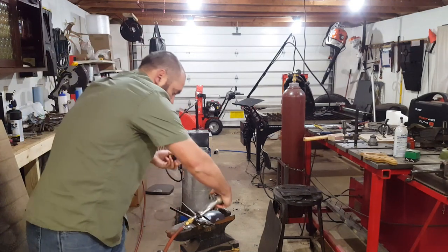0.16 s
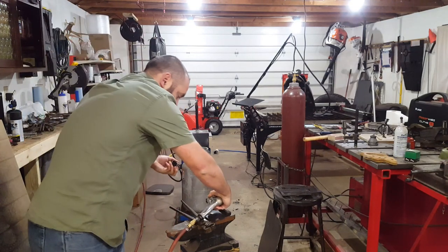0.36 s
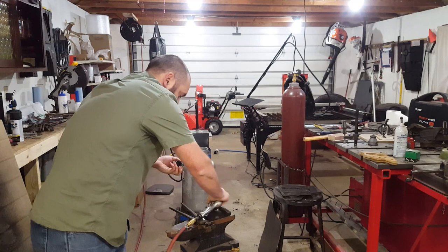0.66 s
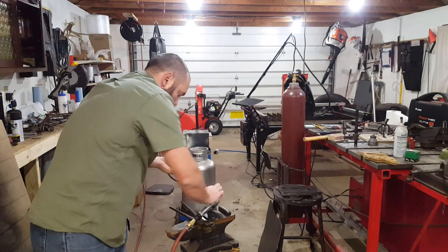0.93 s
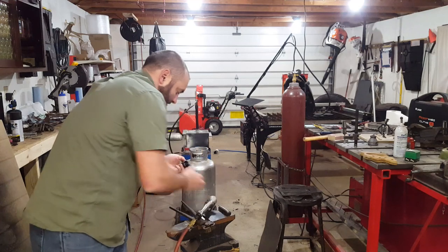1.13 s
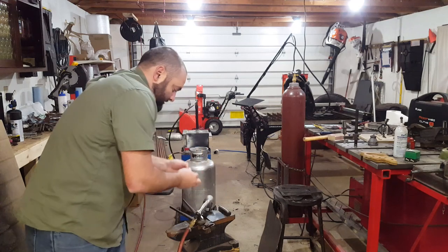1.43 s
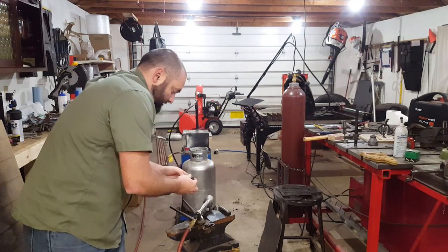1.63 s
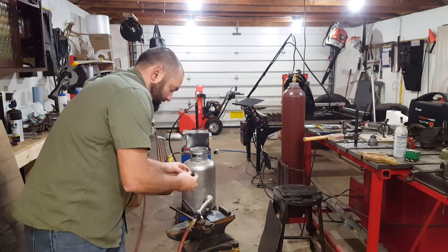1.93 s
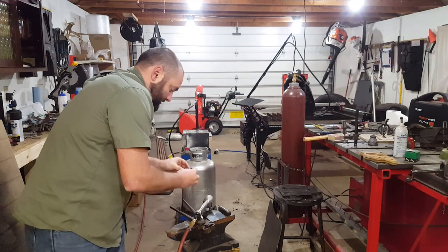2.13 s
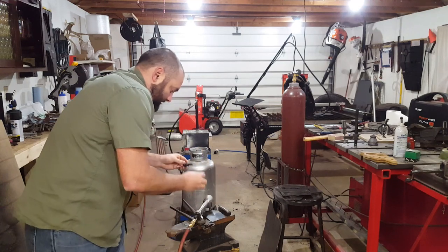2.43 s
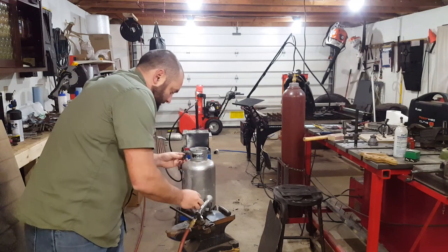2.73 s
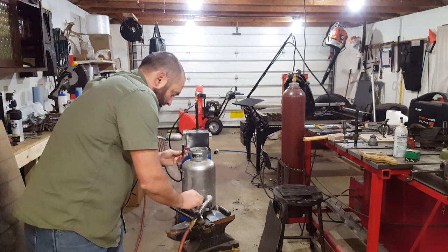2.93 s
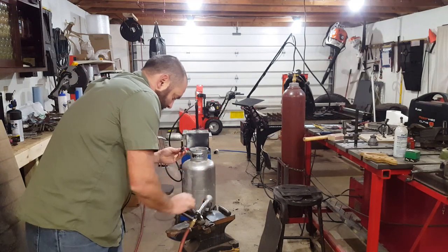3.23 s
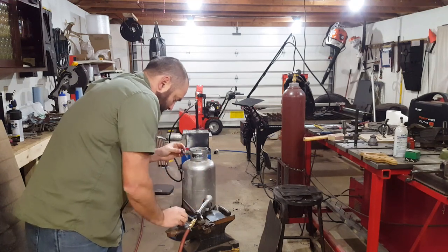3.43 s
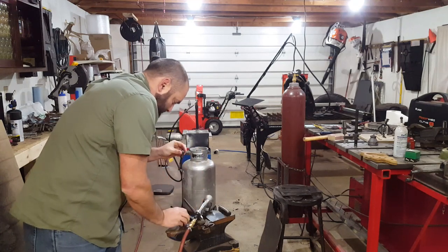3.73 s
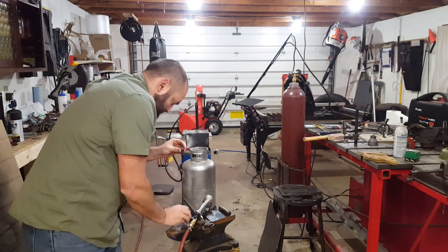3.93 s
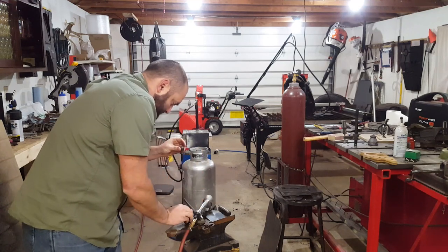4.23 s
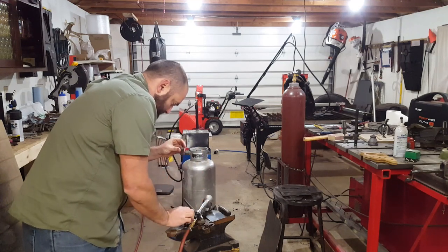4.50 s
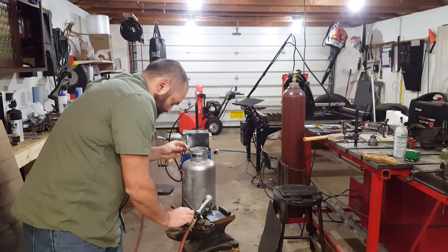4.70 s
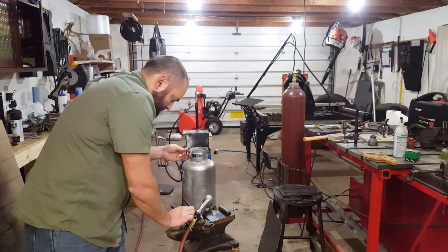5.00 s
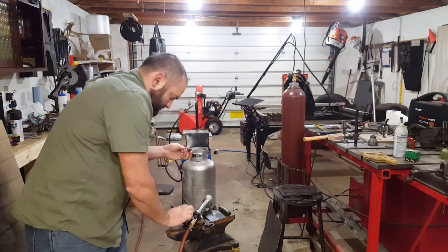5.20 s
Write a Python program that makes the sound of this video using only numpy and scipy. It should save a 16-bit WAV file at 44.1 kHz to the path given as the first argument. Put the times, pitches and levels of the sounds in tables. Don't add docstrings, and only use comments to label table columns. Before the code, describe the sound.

Soft handle knocks, a sudden loud metallic crash and rattling chisel chatter, then long near-quiet with small fittings ticking and tapping in a garage.

```python
import sys
import numpy as np
from scipy import signal
from scipy.fft import rfft, irfft
from scipy.io import wavfile
from scipy.ndimage import uniform_filter1d

SR = 44100
rng = np.random.default_rng(int(sys.argv[2]) if len(sys.argv) > 2 else 0)


def master_out(mix):
    frames = np.transpose(np.atleast_2d(mix))
    ceiling = np.clip(frames, -1, 1)
    pcm = np.round(ceiling * 32767).astype(np.int16)
    wavfile.write(sys.argv[1], SR, pcm)


def volts_from_decibels(level):
    exponent = np.asarray(level, float) / 20
    return 10 ** exponent


N = 236183
SPAN = 3 * 2 ** 13
HZ = np.fft.rfftfreq(SPAN, 1 / SR)

# (time [s], peak level [dB], landing [dB])
BANGS = [(.7288, -9.5, 2), (.7313, -9, 4), (.7358, -9.5, 11), (.7432, -13, 3.5), (.7485, -14, -9),
         (.7595, -15, -2), (.7615, -15, -8.5), (.768, -19, 6), (.7838, -19.5, -8), (.789, -22.5, 9.5),
         (.794, -17.5, -8.5)]
# (frequency [Hz], width [Hz], level [dB])
BARREL = [(306, 76, -23), (1680, 140, -12), (2055, 30, -2), (2130, 26, -3), (2260, 29, -6), (2485, 50, -3),
          (2832, 25, -3), (2915, 45, -1), (3012, 25, -6), (3225, 30, -9), (4385, 34, -6), (4820, 24, -7),
          (5182, 25, -8), (5300, 30, -6), (5628, 22, 0), (6140, 30, -11), (7050, 60, -4), (7315, 45, -2),
          (7405, 40, -5), (7725, 35, -7), (8120, 90, -10), (8400, 200, -9), (8870, 100, -16),
          (9488, 23, -12), (11200, 90, -19), (11800, 90, -19), (12500, 80, -13), (13100, 90, -13),
          (14600, 90, -15)]
# (frequency [Hz], density [dB per Hz])
BARREL_CRACK = [(71, -58.5), (120, -26), (289, -19.5), (727, -19.5), (1120, -25.5), (2070, -7.5),
                (2930, -3), (3740, -13.5), (5520, -5), (6630, -17.5), (7200, -1.5), (10200, -20),
                (16000, -13.5)]
# (frequency [Hz], tilt [dB per landing dB])
ROCK = [(600, 0), (1900, -.5), (2600, 0), (3500, .05), (5500, .15), (7500, .55), (10000, .15), (14000, .15)]


def bangs():
    return strikes(BANGS, BARREL, BARREL_CRACK, ROCK, crack_db=-4.5, blow_s=0.018,
                   wet_db=-0.5, trim_db=-11.5, pan_db=6.0)


# (time [s], peak level [dB], landing [dB])
CHATTER = [(.8605, -18.5, -17), (.8665, -24.5, -11.5), (.8715, -20, 13), (.880, -27.5, -4),
           (1.1085, -25, 12), (1.1165, -19.5, 12.5), (1.120, -24.5, -8), (1.133, -25.5, -14),
           (1.1445, -19.5, -4.5), (1.151, -25.5, 6), (1.154, -26, 9.5), (1.159, -27.5, -4.5),
           (1.168, -27, 4), (1.182, -28, -9.5), (1.194, -28, 18), (1.2005, -25.5, 8), (1.229, -22.5, -14),
           (1.235, -20, 7), (1.2395, -14.5, 13), (1.2525, -26, -1), (1.264, -30.5, 2),
           (1.291, -20.5, -14.5), (1.3035, -18.5, 7), (1.308, -21, -15.5), (1.318, -27.5, -1),
           (1.3205, -27.5, -3), (1.334, -27.5, -10), (1.3385, -31, -4)]
# (frequency [Hz], width [Hz], level [dB])
SHANK = [(1688, 26, -7), (1748, 24, -6), (1808, 20, -6), (1884, 20, -5), (1962, 30, -2), (2068, 28, -7),
         (2135, 24, -7), (1860, 300, -7)]
# (frequency [Hz], width [Hz], level [dB])
CHISEL = [(2490, 150, -14), (2880, 120, -10), (3340, 110, -11), (4310, 25, -10), (4578, 40, -8),
          (4858, 30, -6), (5300, 24, -13), (5626, 30, -6), (6190, 60, -12), (7100, 120, -11),
          (7400, 40, -5), (7468, 45, 3), (7548, 40, -4), (7760, 52, -7), (7550, 400, -9), (8930, 30, -11),
          (9490, 42, -17), (10200, 72, -18), (11400, 120, -20), (12500, 41, -22), (13300, 110, -17),
          (14400, 120, -22), (15000, 52, -16), (15300, 40, -19)]
# (frequency [Hz], density [dB per Hz])
CHISEL_CRACK = [(71, -63), (120, -16.5), (592, -14), (1320, -17.5), (1680, -9), (1900, 2), (2240, -8.5),
                (4680, -4.5), (6500, -11), (7500, -5.5), (9400, -24.5), (15000, -26.5), (16000, -35.5)]


def chatter():
    return strikes(CHATTER, [*SHANK, *CHISEL], CHISEL_CRACK, ROCK, crack_db=-5, blow_s=0.015,
                   wet_db=-1.5, trim_db=-13.0, pan_db=5.5)


# (time [s], hold [s], level [dB])
RATTLE = [
    (1.101, 0.006, -42),
    (1.156, 0.04, -48),
    (1.245, .03, -50),
    (1.31, 0.03, -50),
]


def rattle():
    loose = swell(RATTLE, rise_db_per_s=899, fall_db_per_s=900)
    return rubbing(loose, [*SHANK, *CHISEL], rate=500, spread_db=-8.0, pan_db=19.5, wet_db=5.5)


# (time [s], peak level [dB], landing [dB])
SLIP = [
    (.7008, -15.5, 2.5),
    (.7065, -17.5, -8.5),
]
# (frequency [Hz], width [Hz], level [dB])
VALVE = [(2490, 25, -3), (2850, 25, 0), (4310, 41, -5), (5310, 30, -10), (7310, 30, -7), (7700, 30, -11),
         (8400, 400, -7), (8870, 34, -17), (10000, 26, -25), (13100, 40, -20), (14200, 61, -28)]
# (frequency [Hz], density [dB per Hz])
VALVE_CRACK = [(120, -36), (300, -13), (1000, -20.5), (2700, -6), (3700, -14.5), (5000, -13), (6300, -17),
               (8300, -6.5), (10000, -20), (16000, -27)]
# (frequency [Hz], tilt [dB per landing dB])
TIP = [(600, -0.5), (2000, 0), (4300, -1.5), (7700, 0.6), (12500, 1.18)]


def slip():
    return strikes(SLIP, VALVE, VALVE_CRACK, TIP, crack_db=-10.0, blow_s=0.018,
                   wet_db=6.5, trim_db=-16.0, pan_db=7.0)


# (time [s], peak level [dB], landing [dB])
DROPS = [
    (1.015, -27, 0),
    (1.0345, -32, -14),
    (1.065, -34, -16),
]
# (frequency [Hz], width [Hz], level [dB])
COLLAR = [(940, 90, -6), (1900, 300, -6), (2320, 40, -5), (2920, 39, -4), (3500, 300, -9), (4770, 43, -9),
          (5570, 150, -10), (7430, 37, -4), (7750, 40, 2), (8300, 200, -10), (8940, 28, -7),
          (10200, 82, -21), (11700, 120, -5), (13000, 150, -8), (14700, 41, -20), (15500, 65, -13)]
# (frequency [Hz], density [dB per Hz])
COLLAR_CRACK = [(120, -17), (200, -13.5), (722, -19.5), (933, -2.5), (1530, -13.5), (1940, -2),
                (6760, -12.5), (7680, -2.5), (9580, -28), (11500, -4.5), (16000, -16.5)]
# (frequency [Hz], tilt [dB per landing dB])
DULL = [(900, .6), (1800, 0), (8000, 0), (11000, 1)]


def drops():
    return strikes(DROPS, COLLAR, COLLAR_CRACK, DULL, crack_db=-0.5, blow_s=0.0085,
                   wet_db=3, trim_db=-9.5, pan_db=6.0)


# (time [s], peak level [dB], landing [dB])
KNOCKS = [
    (0.0408, -61.5, 4),
    (0.3107, -34.5, -2),
    (0.3144, -36, -2.5),
    (0.4863, -41, 10.5),
]
# (frequency [Hz], width [Hz], level [dB])
HANDLE = [(334, 36, -6), (587, 30, -2), (1220, 45, -12), (1440, 60, -3), (1670, 20, -8), (1980, 25, -4),
          (2170, 38, 0), (2370, 32, -4), (2650, 30, -6), (3130, 50, -1), (3880, 63, -7), (4340, 38, -11),
          (4710, 45, 0), (6070, 50, -11), (7970, 91, -20)]
# (frequency [Hz], density [dB per Hz])
HANDLE_CRACK = [(120, -27.5), (200, -5.5), (404, -4), (585, -5), (832, -12.5), (1310, -9.5), (1450, -3),
                (1830, -3.5), (3080, -4), (3460, -9.5), (4840, -10.5), (11000, -41.5), (14300, -71.5),
                (22000, -120)]
# (frequency [Hz], tilt [dB per landing dB])
FLAT = [(600, 1.7), (2000, 0.5)]


def knocks():
    return strikes(KNOCKS, HANDLE, HANDLE_CRACK, FLAT, crack_db=-1.0, blow_s=0.015,
                   wet_db=0.5, trim_db=-8.5, pan_db=7.5)


# (time [s], peak level [dB], landing [dB])
BUMPS = [
    (.503, -40, 22),
    (.561, -49.5, -20),
    (.571, -43, -5),
    (.59, -53, -6),
    (.61, -52, -8),
    (4.55, -59, 4),
    (4.575, -57, 8),
    (5.03, -57.5, 18),
]
# (frequency [Hz], width [Hz], level [dB])
HOSE = [(416.3, 350, 1), (1091.3, 280, -3.5), (1620, 110, -8), (2140, 110, -7.5)]
# (frequency [Hz], density [dB per Hz])
HOSE_CRACK = [(88, -35), (150, -6), (442, -1.5), (758, -10), (1150, 3.5), (1340, -12.5), (2100, -14.5),
              (6000, -39.5), (7800, -66.5), (13200, -120)]


def bumps():
    return strikes(BUMPS, HOSE, HOSE_CRACK, FLAT, crack_db=4, blow_s=0.0032,
                   wet_db=1.5, trim_db=-9.5, pan_db=7.0)


# (time [s], hold [s], level [dB])
SLIDE = [
    (.515, .06, -79),
]
# (frequency [Hz], width [Hz], level [dB])
SQUEAK = [(7800, 350, 0)]
# (time [s], hold [s], level [dB])
ZING = [
    (.571, .05, -83),
]
# (frequency [Hz], width [Hz], level [dB])
WHISTLE = [(5466, 150, -8), (7400, 120, 0)]
# (time [s], hold [s], level [dB])
RUSTLE = [
    (0, .07, -74),
    (4.535, 0.039, -73.5),
]
# (frequency [Hz], width [Hz], level [dB])
CLOTH = [(679, 290, 7), (2087, 1300, 0), (3100, 670, -13)]


def hands():
    slide = swell(SLIDE, rise_db_per_s=330.5, fall_db_per_s=331)
    squeak = rubbing(slide, SQUEAK, rate=2100, spread_db=2.0, pan_db=6.5, wet_db=2.5)
    tighten = swell(ZING, rise_db_per_s=2002, fall_db_per_s=399.5)
    zing = rubbing(tighten, WHISTLE, rate=2000, spread_db=1.5, pan_db=6.0, wet_db=-0.5)
    movement = swell(RUSTLE, rise_db_per_s=300, fall_db_per_s=89.5)
    rustle = rubbing(movement, CLOTH, rate=6900, spread_db=6, pan_db=3.5, wet_db=-3.5)
    return squeak + zing + rustle


# (time [s], peak level [dB], landing [dB])
CLINKS = [
    (4.1744, -41.5, -6.5),
    (4.1855, -51, 2),
    (4.2042, -52, 11),
    (4.229, -56, 9),
]
# (frequency [Hz], width [Hz], level [dB])
NUT = [(339, 30, -7), (587, 30, -7), (1705, 80, -1), (2630, 58, -15), (3370, 70, -11), (3690, 50, -12),
       (4400, 300, -10), (6100, 84, -20), (6970, 45, -11), (7850, 60, -14), (8260, 60, -9)]
# (frequency [Hz], density [dB per Hz])
NUT_CRACK = [(120, -3.5), (300, -7.5), (600, -13.5), (1000, -22.5), (1710, -7.5), (2300, -13.5),
             (4300, -13.5), (7900, -12.5), (9900, -27), (12400, -17), (16000, -24)]


def clinks():
    return strikes(CLINKS, NUT, NUT_CRACK, FLAT, crack_db=-3.0, blow_s=0.03,
                   wet_db=1.5, trim_db=-10.0, pan_db=7.5)


# (time [s], peak level [dB], landing [dB])
TAPS = [
    (3.464, -40.5, -1.5),
    (3.4678, -44, 5.5),
    (3.581, -50.5, -5),
    (3.5855, -54, -14.5),
    (3.6045, -64.5, 4),
]
# (frequency [Hz], width [Hz], level [dB])
TRAY = [(162, 24, -2), (350, 60, -3), (525, 160, -16), (1990, 110, -10), (3990, 200, -13), (4670, 200, -15),
        (6390, 60, -9), (6570, 70, -8), (6910, 60, -9), (7170, 150, -10), (7400, 70, -8), (7750, 80, -6),
        (7910, 70, -7), (8200, 400, -6)]
# (frequency [Hz], density [dB per Hz])
TRAY_CRACK = [(90, -37.5), (150, 0), (260, -12.5), (600, -13), (1100, -21.5), (2000, -18), (3000, -19),
              (4200, -14), (5600, -20.5), (7600, -4.5), (9900, -33.5), (13000, -19), (16000, -25)]


def taps():
    return strikes(TAPS, TRAY, TRAY_CRACK, FLAT, crack_db=2, blow_s=0.0065,
                   wet_db=4.0, trim_db=-10.5, pan_db=6.5)


# (time [s], peak level [dB], landing [dB])
TICKS = [
    (1.543, -64, 10.5),
    (1.7195, -57, -3),
    (1.754, -60, 12),
    (2.08, -71, 11.5),
    (2.296, -65, -1),
    (2.332, -50, -3.5),
    (2.36, -71, 3),
]
# (frequency [Hz], width [Hz], level [dB])
FITTING = [(6600, 71, -14), (7000, 73, -14), (8075, 30, 5), (8255, 60, -5)]
# (frequency [Hz], density [dB per Hz])
FITTING_CRACK = [(880, -39), (1500, -17), (2160, -15.5), (4730, -22), (8240, -3.5), (9750, -22.5),
                 (12700, -12.5), (16000, -16.5)]


def ticks():
    return strikes(TICKS, FITTING, FITTING_CRACK, TIP, crack_db=-8.5, blow_s=0.013,
                   wet_db=6, trim_db=-11.0, pan_db=7.5)


# (time [s], peak level [dB], landing [dB])
PINGS = [
    (4.533, -64.5, 8),
    (5.02, -57, -1.5),
]
# (frequency [Hz], width [Hz], level [dB])
PIN = [(1750, 60, -8), (2050, 80, -12), (6970, 35, 4), (7400, 700, -11)]
# (frequency [Hz], density [dB per Hz])
PIN_CRACK = [(400, -28), (2000, -1), (4500, -16), (7000, -25), (9000, -22), (11000, -33)]


def pings():
    return strikes(PINGS, PIN, PIN_CRACK, TIP, crack_db=-7.0, blow_s=0.018,
                   wet_db=3.5, trim_db=-12.0, pan_db=7.0)


def strikes(rows, modes, crack, landing, crack_db, blow_s, wet_db, trim_db, pan_db):
    out = np.zeros((2, N + SPAN))
    t = np.arange(800) / SR
    bells = ringing(modes)
    broad = causal(crack_db + along(crack, HZ))
    pair = ears(pan_db)
    for s, db, landing_db in rows:
        envelope = volts_from_decibels(-60 * t / blow_s) * (1 - np.exp(-t / 0.0011))
        blow = rfft(rng.standard_normal(len(t)) * envelope, SPAN)
        lumps_db = 10 * np.log10(uniform_filter1d(abs(blow) ** 2, 90) + 1e-6)
        colour = causal(landing_db * along(landing, HZ) - lumps_db)
        luck = volts_from_decibels(1.7 * rng.standard_normal(len(modes)))
        direct = blow * colour * (luck @ bells + broad)
        size = np.linalg.norm(irfft(direct)[:264]) / np.sqrt(264)
        start = round(s * SR)
        heard = irfft(direct * pair * echoed(wet_db))
        out[:, start:start + SPAN] += volts_from_decibels(db + trim_db) / size * heard
    return out[:, :N]


def rubbing(curve, modes, rate, spread_db, pan_db, wet_db):
    hits = (rng.random(N) < rate / SR) * rng.standard_normal(N)
    hits = hits * volts_from_decibels(spread_db * rng.standard_normal(N))
    body = ringing(modes).sum(0)
    body /= np.linalg.norm(irfft(body)) * np.sqrt(np.mean(hits ** 2))
    heard = irfft(body * ears(pan_db) * echoed(wet_db))
    return signal.fftconvolve((hits * curve)[None], heard, axes=1)[:, :N]


def swell(rows, rise_db_per_s, fall_db_per_s):
    s, hold, db = np.transpose(rows)[:, :, None]
    t = np.arange(N) / SR
    rise_db = rise_db_per_s * np.maximum(s - t, 0)
    fall_db = fall_db_per_s * np.maximum(t - s - hold, 0)
    return volts_from_decibels(db - rise_db - fall_db).sum(0)


def ringing(modes, f=HZ):
    c, w, db = np.transpose(modes)[:, :, None]
    damping = 1.5j * f * w
    return volts_from_decibels(db) * (damping / (c * c - f * f + damping)) ** 2


def causal(db):
    c = irfft(np.maximum(db, -120) * np.log(10) / 20)
    c[1:SPAN // 2] *= 2
    c[SPAN // 2 + 1:] = 0
    return np.exp(rfft(c))


def along(points, hz):
    f, v = np.transpose(points)
    return np.interp(np.log(hz + 1), np.log(f + 1), v)


# (frequency [Hz], extra left-right level [dB])
SHADOW = [(200, 0), (700, 3.5), (2500, 4.5), (5000, 1), (8500, -0.5), (13000, -6.5)]


def ears(pan_db):
    half = (pan_db + along(SHADOW, HZ)) / 2
    lag_s = 2e-5
    return np.array([causal(half), causal(-half) * np.exp(-2j * np.pi * HZ * lag_s)])


def echoed(wet_db):
    return 1 + volts_from_decibels(wet_db) * garage(gap_s=0.0034, near_db=4.5, near_s=0.026)


# (frequency [Hz], time to fall 60 dB [s])
GARAGE = [(150, 0.68), (700, 0.5), (2000, 0.42), (6000, 0.47), (12000, 0.26)]
# (frequency [Hz], left-right likeness [-1 to 1])
WALLS = [(150, 0.99), (600, 0.52), (2000, 0.15), (10000, 0.084)]


def garage(gap_s, near_db, near_s):
    hz = np.fft.rfftfreq(256, 1 / SR)
    t = np.arange(160) * 128 / SR
    z = rng.standard_normal((2, len(hz), len(t), 2)) @ [1, 1j]
    decay = volts_from_decibels(-60 * t / along(GARAGE, hz)[:, None])
    tail = signal.istft(paired(z, WALLS, hz) * decay, SR, nperseg=256)[1]
    t = np.arange(tail.shape[1]) / SR
    tail *= (1 - np.exp(-t / gap_s)) * (1 + volts_from_decibels(near_db - 60 * t / near_s))
    return rfft(tail / np.sqrt(np.sum(tail ** 2) / 2), SPAN)


def paired(z, alike, hz):
    turn = np.arccos(np.clip(along(alike, hz), -1, 1))[:, None] / 2
    mid, side = z[0] * np.cos(turn), z[1] * np.sin(turn)
    return np.array([mid + side, mid - side])


# (frequency [Hz], density [dB per Hz])
DRONE = [(15, -38.5), (25, -22), (40, -18.5), (55, -5), (70, 1.5), (90, 0), (130, -7), (155, -15),
         (350, -16), (480, -17.5), (700, -21.5), (910, -52.5), (1540, -120)]
# (time [s], hold [s], added level [dB])
SURGE = [
    (5.13, .18, -6),
]


def drone():
    surge = swell(SURGE, rise_db_per_s=298, fall_db_per_s=100)
    return air(DRONE, -66, patchy_db=0.5) * (1 + surge)


# (frequency [Hz], density [dB per Hz])
HISS = [(410, -30.5), (700, -5), (757, -4.5), (852, -8.5), (1010, -7), (1230, -7.5), (5400, -15.5),
        (9730, -22.5), (14400, -17), (16000, -19.5)]


def hiss():
    return air(HISS, -74.5, patchy_db=1.0)


# (frequency [Hz], left-right likeness [-1 to 1])
ALIKE = [(60, 0.9), (180, 0.77), (550, 0.1255), (1650, 0.097), (4970, -0.5), (15000, -0.11)]
# (frequency [Hz], left-right level [dB])
LEAN = [(60, 3.5), (180, 3.5), (550, 2), (1650, 1.5), (4970, 1.5), (15000, 0.0)]


def air(spectrum, db, patchy_db):
    hz, _, z = signal.stft(rng.standard_normal((2, N + 4096)), SR, nperseg=2048)
    patches = uniform_filter1d(rng.standard_normal(z.shape[1:]), 20, 0)
    patches = uniform_filter1d(patches, 4, 1)
    half = along(LEAN, hz) / 2
    gain = volts_from_decibels(along(spectrum, hz) + np.array([half, -half]))[:, :, None]
    gain = gain * volts_from_decibels(patchy_db * patches / patches.std())
    pair = signal.istft(paired(z, ALIKE, hz) * gain, SR, nperseg=2048)[1][:, :N]
    return volts_from_decibels(db) * pair / pair.mean(0).std()


def scene():
    low = drone()
    hammer = knocks() + bumps() + slip() + bangs() + drops() + chatter() + rattle()
    grip = hands()
    fittings = ticks() + taps() + clinks() + pings()
    return hammer + grip + fittings + low + hiss()


def band_limit(x):
    return signal.sosfilt(signal.butter(12, 16690, fs=SR, output="sos"), x)


def record(dry):
    size = 2 ** 18
    passed = np.fft.rfftfreq(size, 1 / SR) < 15850
    kept = irfft(rfft(dry, size) * passed)[:, :N]
    return band_limit(kept - 0.0005)


dry = scene()
out = record(dry)
master_out(out)
```